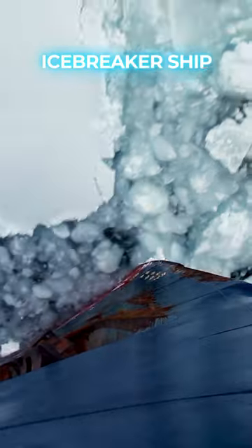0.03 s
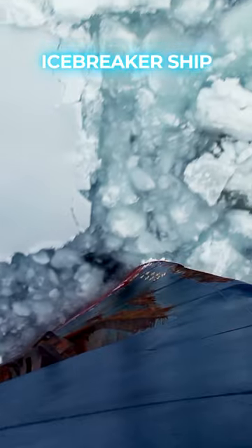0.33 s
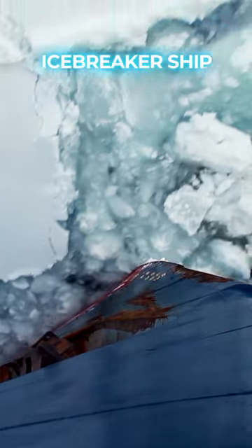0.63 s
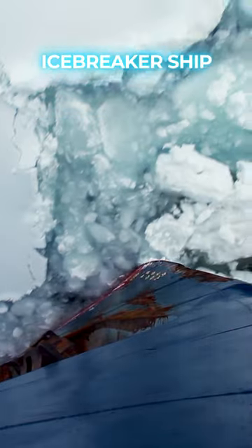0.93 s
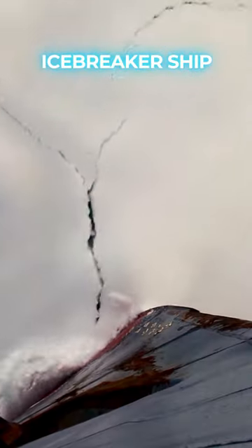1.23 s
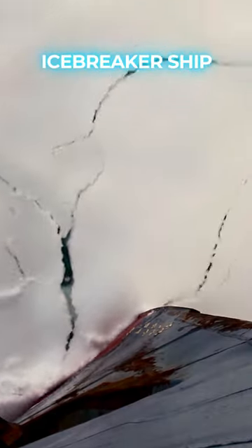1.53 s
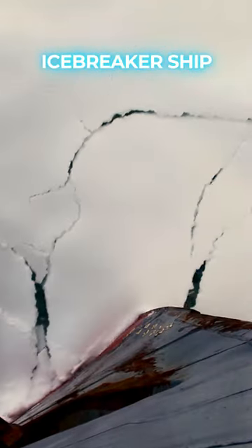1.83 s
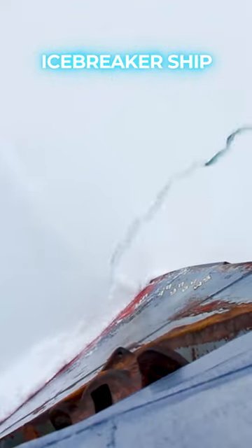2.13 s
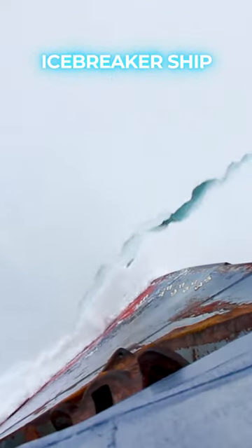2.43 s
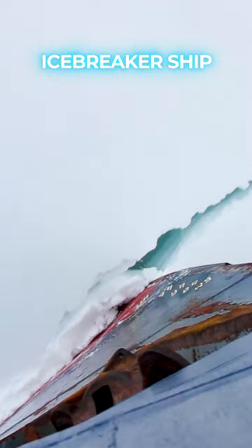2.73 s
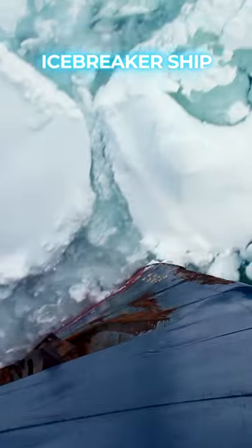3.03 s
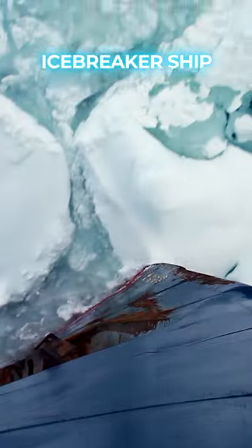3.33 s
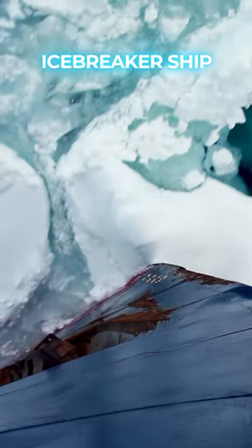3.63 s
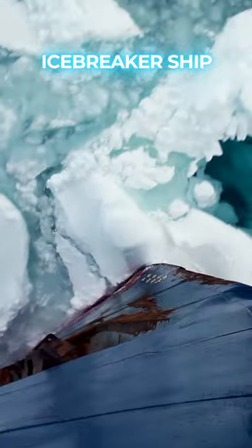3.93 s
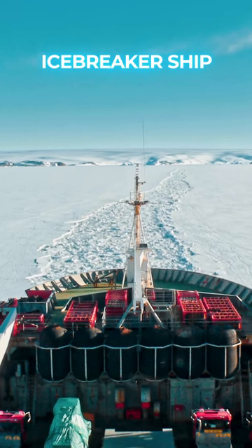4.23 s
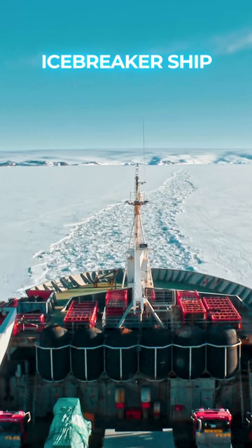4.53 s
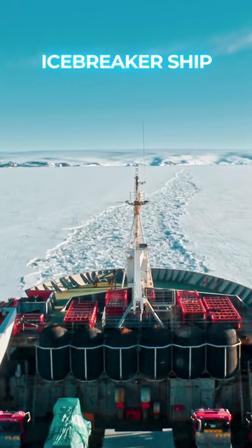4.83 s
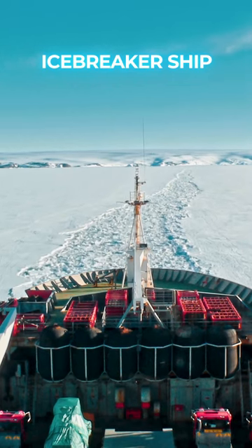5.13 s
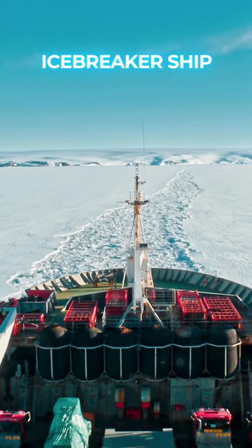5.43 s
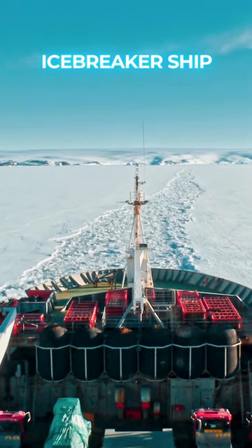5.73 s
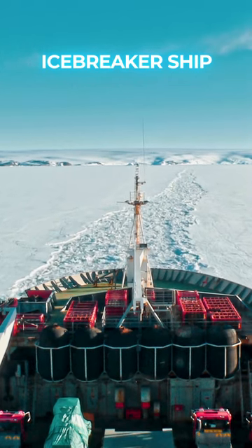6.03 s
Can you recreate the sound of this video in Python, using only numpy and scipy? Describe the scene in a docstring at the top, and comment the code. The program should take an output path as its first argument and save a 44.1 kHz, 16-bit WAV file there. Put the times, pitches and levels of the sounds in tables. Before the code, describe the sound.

Close to a ship's bow in sea ice, a deep, muffled boom opens, with fizzing slush that dies away after half a second. Until about 4 seconds, ice grinds along the steel and crunches in surges, with sharp cracks, hissing powder and dull knocks of loose blocks. Faint, rough creaks recur until 2.7 seconds. Breaking slabs boom and rattle against the hull at about 1.6 and 2.1 seconds, then rumble as they roll underneath. The crunching is strongest around 3.4 and 3.8 seconds, where another deep boom lands. Three thin, bright clicks stand apart from the ice at about 0.5, 3.1 and 4.1 seconds. An engine rumble swells from 3.6 seconds, and just after 4 seconds the crunching stops and the microphone is on the open deck. Wind, steady engine rumble and a thin, wavering machinery whine continue until the end, at about 6 seconds.

```python
"""A deep boom and a wash of slush, heard close up as an icebreaker's bow rides onto sea ice.
Floes grind and creak along the steel, the ice snaps, crunches in surges and sheds hissing powder,
and loose blocks knock on the bow. Breaking slabs ring the hull, then rumble as they roll under it.
Three thin, bright clicks stand apart from the ice. After four seconds the microphone is on the
open deck: wind, a steady engine rumble and a thin machinery whine."""
import sys
import numpy as np
from scipy import signal
from scipy.fft import rfft, irfft
from scipy.io import wavfile

SR = 44100
rng = np.random.default_rng(int(sys.argv[2]) if len(sys.argv) > 2 else 0)


def wrap_up_sound(samples):
    """Save the sound to the file named by the first command line argument, as 16-bit audio."""
    columns = np.atleast_2d(samples).T
    # keep every value between -1 and 1, then stretch to whole-number steps
    tamed = np.clip(columns, -1, 1)
    steps = np.round(tamed * 32767).astype(np.int16)
    wavfile.write(sys.argv[1], SR, steps)


N = 268569
T = np.arange(N) / SR
FREQ = np.maximum(np.fft.rfftfreq(N, 1 / SR), 1)
TOP_HZ = 15850

# Tone colours at the microphone. Each row: frequency in Hz, relative spectral density in dB.
DECK_COLOUR = [(11, -25), (18, 4), (36, -6), (83, -7), (99, -13.5), (128, -10.5), (152, -16), (180, -13.5),
               (226, -15.5), (317, -14), (355, -14), (1020, -26.5), (1310, -30), (2130, -37), (3300, -45.5),
               (4900, -52), (8500, -61.5), (16000, -72)]
SLUSH_COLOUR = [(1500, 2), (2300, 1), (2800, -2), (4000, -4), (5200, -5), (6300, -12), (9000, -41)]
POWDER_COLOUR = [(2000, 1), (3500, -2), (5500, -0.5), (7500, -1), (10500, -3.5), (11800, -7), (13000, -15),
                 (16000, -16)]
CRUNCH_COLOUR = [(300, -15), (600, -1), (900, -4), (1250, -3.5), (1750, -2.5), (2300, -10), (3100, -17),
                 (4700, -18), (6500, -40), (10000, -38), (16000, -66)]
GRIND_COLOUR = [(18, -17), (28, 7), (45, -2.5), (85, 4), (120, 0), (180, -2), (280, -7), (370, -7.5),
                (520, -13), (750, -18.5), (1100, -23.5), (2200, -36), (4000, -59)]
RATTLE_COLOUR = [(110, -12), (175, 2), (225, -2), (290, -1), (350, 3), (420, -4.5), (490, -3), (560, -10),
                 (660, -16), (1000, -19.5), (1400, -27), (2000, -31), (3000, -39), (4700, -49), (7000, -70)]
# Stereo image on deck and at the bow. Each row: frequency in Hz, correlation of left and right.
DECK_IMAGE = [(60, 0.28), (290, 0.25), (1400, 0.28), (15000, 0.3)]
BOW_IMAGE = [(40, 0.49), (120, 0.72), (300, 0.5), (700, 0.2), (1500, 0.25), (3100, 0.25), (6800, 0.7),
             (14000, 0.71)]
# Engine hum and machinery whine. Each row: frequency in Hz, rms level in dB.
MACHINE_TONES = [(79.5, -39), (314, -42.5), (535, -53), (627, -55), (705, -55), (773, -54), (787, -51.5),
                 (851, -50), (941, -54), (1005, -46.8), (1082, -53), (1154, -55.5), (1181, -61),
                 (1384, -61), (1550, -59), (1685, -63), (1929, -62), (2072, -64), (2170, -60.5),
                 (2848, -72), (3112, -71)]
# Ice creaking under load. Each row: centre in seconds, rms level in dB, pitch in Hz,
# half length in seconds.
ICE_CREAKS = [(.11, -50, 1785, .09), (.36, -50, 1790, .1), (.55, -46, 1780, .07), (.975, -45, 1800, .03),
              (1.2, -45, 1760, .035), (1.85, -45, 1690, .027), (2.384, -45.5, 1690, .027),
              (2.69, -45, 1210, .025)]
# Loose blocks on the bow. Each row: start in seconds, level in dB, pitch in Hz, decay in seconds.
BLOCK_KNOCKS = [(.046, -22, 345, .02), (.112, -12.5, 150, .042), (.428, -19, 340, .02),
                (.475, -21, 170, .02), (.55, -21, 345, .02), (.618, -16, 135, .025),
                (1.068, -23, 350, .014), (1.146, -18.5, 200, .016), (1.243, -24.5, 880, .014),
                (1.272, -18, 185, .018), (1.704, -18, 600, .007), (2.237, -20, 550, .009),
                (2.955, -22, 230, .025), (3.043, -16.5, 350, .009), (3.048, -15, 150, .011),
                (3.787, -16.5, 345, .022)]
# The ring of a loose block. Each row: multiple of its pitch, relative level in dB.
BLOCK_MODES = [(.3, -4), (1, 0), (1.37, -8), (2.2, -16)]
# Short, sharp sounds. Each row: start in seconds, level in dB, centre in Hz, decay in seconds,
# share of clean impulse from 0 to 1.
TRANSIENTS = [(.058, -32, 9000, .001, .85), (.157, -30, 3300, .005, .35), (.229, -26, 2200, .008, .25),
              (.313, -36, 9500, .006, .25), (.5277, -24, 10000, .001, .9), (.629, -23.5, 2700, .006, .25),
              (.677, -27.5, 3000, .003, .5), (.951, -26.5, 2100, .007, .35), (1.052, -45, 12000, .004, .2),
              (1.823, -35, 6000, .002, .5), (1.861, -25.5, 6500, .006, .5), (2.074, -36, 10100, .001, .8),
              (2.357, -33, 7000, .002, .5), (2.395, -27.5, 5500, .008, .5), (2.759, -32, 8500, .007, .4),
              (2.845, -42, 7000, .007, .3), (2.915, -40, 7500, .007, .3), (3.0575, -28, 10000, .003, .55),
              (3.619, -41.5, 8900, .0035, .35), (3.741, -41, 8500, .003, .45),
              (4.057, -36, 8500, .001, .75)]
# Three thin, bright clicks; the other rows are ice cracks.
CLICKS = [row for row in TRANSIENTS if row[0] in (.5277, 3.0575, 4.057)]
ICE_CRACKS = [row for row in TRANSIENTS if row not in CLICKS]
# Snow sliding off the floes. Each row: peak time in seconds, level in dB, rise and fall in seconds.
SNOW_SPILLS = [(1.031, -57.5, 0.17, 0.11), (1.33, -53.5, 0.086, 0.09), (1.62, -63.5, 1.4, 0.55),
               (2.05, -57.5, 0.17, 0.06), (2.628, -57.5, 0.35, 0.15), (2.845, -53.5, 0.054, 0.033),
               (3.1, -54, 0.03, 0.15), (3.53, -53, 0.078, 0.052)]
# Ice crushed at the bow. Each row: peak time in seconds, crunch, powder and grinding levels in dB,
# rise and fall of the crunch in seconds.
CRUSH_SURGES = [(.36, -45, -59, -29.5, 0.79, 0.58), (.645, -41, -69, -32.5, 0.074, 0.075),
                (.96, -40, -64, -53, 0.062, 0.068), (1.033, -42.5, -62, -34, 0.024, 0.033),
                (1.155, -42.5, -60, -31.5, 0.067, .045), (1.24, -39, -53.5, -33.5, 0.081, 0.051),
                (1.31, -44, -59, -34.5, 0.035, 0.051), (1.865, -42.5, -57, -35, 0.059, 0.06),
                (2.397, -41.5, -57, -46, 0.057, 0.049), (2.72, -43.5, -56, -35, 0.066, 0.077),
                (2.97, -51, -79, -33.5, 0.043, 0.07), (3.058, -48, -53.5, -41, 0.0041, 0.055),
                (3.385, -38, -51, -29.5, 0.11, 0.082), (3.47, -39, -52, -29, 0.061, 0.067),
                (3.815, -37.5, -53, -35, 0.072, 0.052), (3.865, -36, -53, -32.5, 0.046, 0.053)]
# Slabs rolling under the hull. Each row: peak time in seconds, rumble and scraping levels in dB,
# rise and fall in seconds.
SLAB_ROLLS = [(1.86, -26.5, -34.5, 0.15, 0.21), (2.39, -24, -33, 0.5, 0.27), (3.6, -25, -39, 0.58, 0.7),
              (4.6, -33, -50, 0.21, 0.21)]
# Slabs breaking. Each row: start in seconds, force in dB, length in seconds, rattle level in dB,
# hardness as the frequency in Hz above which the blow weakens.
SLAB_BREAKS = [(.064, 4, .055, -29, 105), (1.128, -12, .04, -37, 300), (1.561, 2.5, .135, -24, 300),
               (1.9, -17, .05, -30.5, 300), (2.095, 2, .125, -25, 300), (2.434, -15, .05, -30.5, 300),
               (3.761, -11, .022, -27, 300), (3.801, 8, .022, -35, 75)]
# The ring of the hull. Each row: frequency in Hz, relative level in dB,
# decay as a share of the break's length.
HULL_MODES = [(60, -7.5, .8), (79, -7.5, .9), (108, -3, .7), (148, -8, 1.0), (172, -11, 1.0),
              (248, -17, .4), (325, -17, .8)]


def undb(db):
    """Decibels to gain."""
    return 10 ** (np.asarray(db) / 20)


def across(points):
    """(Hz, value) points joined on a log-frequency axis."""
    hz, value = np.transpose(points)
    return np.interp(np.log(FREQ), np.log(hz), value)


def resonance(hz, width):
    """Response of one damped resonance, gain 1 at its centre."""
    return 1 / (1 + 1j * (FREQ ** 2 - hz ** 2) / (FREQ * width))


def lowpass(x, hz, slope=4):
    """Roll off the treble above hz."""
    return irfft(rfft(x) / (1 + (FREQ / hz) ** slope), N)


def resonate(x, hz, width):
    """Pass a signal twice through one resonance."""
    return irfft(rfft(x) * resonance(hz, width) ** 2, N)


def unit(x):
    """Scale to rms 1."""
    return x / np.sqrt(np.mean(x ** 2))


def walk(hz):
    """Smooth random wandering, spread 1."""
    return unit(lowpass(rng.standard_normal(N), hz))


def pan(db):
    """Left and right gains for a level difference; positive is left."""
    return undb(np.array([[db], [-db]]) / 2)


def swell(peak, rise, fall):
    """A load that builds to a rounded crest of 1 and lets go."""
    away = np.maximum((peak - T) / rise, (T - peak) / fall)
    return np.exp(-np.minimum(away, 20) ** 1.84)


def grains(per_s, spread_db):
    """Two unrelated streams of tiny fractures: many faint, a few strong."""
    happens = rng.random((2, N)) < per_s / SR
    size = undb(spread_db * np.minimum(rng.exponential(size=(2, N)), 5))
    return happens * size * rng.choice([-1, 1], (2, N))


def voice(pair, colour, image=BOW_IMAGE, band_hz=(20, TOP_HZ)):
    """Colour two streams as mid and side and decode to stereo; the mid has rms 1 inside the band."""
    mid, side = rfft(pair) * undb(across(colour)) * FREQ ** 2 / (FREQ ** 2 + 10 ** 2)
    alike = np.clip(across(image), 0, 1)
    side = side * np.sqrt((1 - alike) / (1 + alike))
    inside = irfft(mid * (FREQ > band_hz[0]) * (FREQ < band_hz[1]), N)
    return irfft(np.array([mid + side, mid - side]), N) / inside.std()


def transient(start, db, hz, decay, clean):
    """An impulse and a short tail of noise through one broad resonance."""
    impulse = np.arange(N) == int(start * SR)
    tail = rng.standard_normal(N) * (T >= start) * np.exp(-np.abs(T - start) / decay)
    width = hz * np.interp(hz, (600, 6000), (.5, 1.3))  # dull ones ring more narrowly
    parts = lowpass(resonate(np.array([impulse, tail]), hz, width), hz=14500, slope=8)
    weights = np.array([clean, 1 - clean]) / np.abs(parts).max(axis=1)
    return undb(db) * (weights @ parts) * pan(db=.91 * rng.standard_normal())


def machinery():
    """Wavering engine and machinery tones, reflected off the superstructure to the microphone."""
    sound = np.zeros((2, N))
    for hz, db in MACHINE_TONES:
        phase = 2 * np.pi * np.cumsum(hz * (1 + .0016 * walk(7.56))) / SR
        paths = .55 * np.array([walk(1.5), walk(3)])  # each side gets its own phase
        sound += np.sqrt(2) * undb(db + 1.4 * walk(6)) * np.sin(phase + paths)
    return sound


def deck():
    """Out on deck: engine rumble swells first, then at 4.05 s the scene changes and the wind and machinery come
    in at once."""
    arrival = np.clip((T - 3.6) / .32, 0, 1)
    upper_in = np.clip((T - 4.045) / .015, 0, 1)
    deck_db, muted_db = -27, -5
    air = voice(rng.standard_normal((2, N)), DECK_COLOUR, DECK_IMAGE)
    low = lowpass(air, hz=110)
    gusts = undb(1.6 * np.array([walk(12), walk(12)]))  # buffet each side separately
    rumble = low * gusts * pan(db=-2)
    flutter = undb(.4 * walk(7))
    rush = (air - low) * flutter * undb(muted_db * (1 - upper_in))
    return ((rumble + rush) * undb(deck_db) + machinery() * upper_in) * arrival


def clicks():
    """Three thin, bright clicks."""
    return sum(transient(*row) for row in CLICKS)


def slush():
    """Wet brash ice fizzes and crackles past the bow, then dies away."""
    fizz = voice(grains(per_s=6500, spread_db=0), SLUSH_COLOUR)
    crackle = voice(grains(per_s=260, spread_db=2.3), SLUSH_COLOUR)
    wash = unit(fizz + .8 * crackle) * undb(.9 * walk(25))
    level_db, hold_s, fall_db_per_s = -41, .53, 148
    return wash * undb(level_db - fall_db_per_s * np.maximum(T - hold_s, 0)) * pan(db=-1)


def creaks():
    """Loaded ice sticks and slips on the steel: a rough, wavering squeak just right of centre."""
    sound = np.zeros(N)
    sag_hz_per_s = 150  # the pitch sinks as the ice yields
    waver = 1 + .008 * walk(40) + .012 * walk(400)
    rasp = unit(undb(3.5 * walk(120)))
    for centre, db, hz, half_length in ICE_CREAKS:
        phase = 2 * np.pi * np.cumsum((hz - sag_hz_per_s * (T - centre)) * waver) / SR
        envelope = np.exp(-((T - centre) / half_length) ** 2)
        sound += np.sqrt(2) * undb(db) * rasp * np.sin(phase) * envelope
    return sound * pan(db=-1)


def knocks():
    """Loose blocks bump the bow and ring briefly, each at its own pitch."""
    sound = np.zeros(N)
    for start, db, hz, decay in BLOCK_KNOCKS:
        age = np.maximum(T - start, 0)
        blow = undb(db) * (1 - np.exp(-age / .001)) * np.exp(-age / decay)
        for ratio, mode_db in BLOCK_MODES:
            sound += blow * undb(mode_db) * np.sin(2 * np.pi * ratio * hz * age)
    return sound


def cracks():
    """Ice cracks close by: one clean fracture, then a crumble that dies in milliseconds."""
    return sum(transient(*row) for row in ICE_CRACKS)


def powder():
    """Fine powder hisses off the ice, with single crystals crackling out of it."""
    band_hz = (7000, 12000)
    hiss = voice(grains(per_s=16000, spread_db=2), POWDER_COLOUR, band_hz=band_hz)
    crystals = voice(grains(per_s=200, spread_db=2.3), POWDER_COLOUR, band_hz=band_hz)
    return hiss + undb(-9.5) * crystals


def splinters(crushing):
    """Coarse bright chips that fly when the load is high."""
    chips = resonate(grains(per_s=420, spread_db=1.7), hz=4500, width=3000)
    chips = unit(lowpass(chips, hz=6200, slope=8))
    full_load = .75 * crushing.max()
    return chips * undb(-11.5) * crushing * np.minimum(crushing / full_load, 1) ** 2


def chunks():
    """Pieces crumble off the floe edge and ring briefly; small ones are higher and fainter."""
    per_s, low_hz, high_hz, decay_cycles, spread_db = 130, 750, 4200, 13, 2.6
    sound = np.zeros((2, N))
    for when, smallness, luck, place in rng.random((int(per_s * T[-1]), 4)):
        hz = low_hz * (high_hz / low_hz) ** smallness
        start = int(when * N)
        age = T[:min(N - start, SR // 10)]
        size = undb(spread_db * min(-np.log(1 - luck), 3)) * (low_hz / hz) ** .4
        ring = size * np.exp(-age * hz / decay_cycles) * np.sin(2 * np.pi * hz * age)
        sound[:, start:start + len(age)] += ring * np.sqrt([[place], [1 - place]])
    return unit(sound)


def loads():
    """Strength of grinding, crushing and shedding: contact, surges, rolls and spills sum in power."""
    grinding, crushing, shedding = (np.full(N, undb(db) ** 2) for db in (-34, -51.5, -64))
    grind_stretch, powder_lag_s = 1.4, .0024  # grinding moves more slowly; powder trails the crush
    for peak, crunch_db, powder_db, grind_db, rise, fall in CRUSH_SURGES:
        grinding += (undb(grind_db) * swell(peak, grind_stretch * rise, grind_stretch * fall)) ** 2
        crushing += (undb(crunch_db) * swell(peak, rise, fall)) ** 2
        shedding += (undb(powder_db) * swell(peak + powder_lag_s, rise, fall)) ** 2
    for peak, _, scrape_db, rise, fall in SLAB_ROLLS:
        grinding += (undb(scrape_db) * swell(peak, rise, fall)) ** 2
    for peak, db, rise, fall in SNOW_SPILLS:
        shedding += (undb(db) * swell(peak, rise, fall)) ** 2
    return np.sqrt([grinding, crushing, shedding])


def floes():
    """Floes judder along the steel, crush into grains left of centre and shed fine powder."""
    grind = voice(grains(per_s=2500, spread_db=1.5), GRIND_COLOUR, band_hz=(170, 550))
    crunch = voice(grains(per_s=4500, spread_db=.7), CRUNCH_COLOUR, band_hz=(1300, 3000))
    hiss = powder()
    fits = undb(.5 * walk(32))  # the ice gives way in fits: crunch and powder flicker together
    grinding, crushing, shedding = loads()
    sound = grind * grinding
    sound += crunch * crushing * fits * pan(db=4)
    sound += splinters(crushing) * pan(db=1.5)
    sound += chunks() * crushing * undb(-4) * pan(db=3)
    sound += hiss * shedding * fits * pan(db=-1)
    end_s, fade_s = 4.1, .091
    return sound * np.clip((end_s - T) / fade_s, 0, 1)


def dull_blows():
    """A run of dull blows inside the ice, much alike left and right."""
    mid, side = unit(resonate(grains(per_s=1500, spread_db=.5), hz=86.6, width=165))
    return mid + undb(-6.5) * np.array([side, -side])


def rolling_slabs():
    """Broken slabs rumble as they turn over, down under the hull."""
    power = sum((undb(db) * swell(peak, rise, fall)) ** 2 for peak, db, _, rise, fall in SLAB_ROLLS)
    return dull_blows() * np.sqrt(power)


def booms():
    """A slab breaks with one blow and a run of smaller ones; the hull rings and pieces rattle on it."""
    ring, strain, tumble = np.zeros((3, N))
    for start, db, length, rattle_db, hard_hz in SLAB_BREAKS:
        age = np.maximum(T - start, 0)
        force = undb(db) * (1 - np.exp(-age / .004))
        # a soft, broad contact rings only the lowest modes
        reach = lambda hz: 1 / np.hypot(1, (hz / hard_hz) ** 2)
        for hz, mode_db, share in HULL_MODES:
            mode = np.exp(-age / (share * length)) * np.sin(2 * np.pi * hz * age)
            ring += force * reach(hz) * undb(mode_db) * mode
        strain += force * reach(110) * np.exp(-age / length)
        # the pieces gather speed, hit hardest about one length later and settle
        late = age / (.85 * length)
        tumble += undb(rattle_db) * late * np.exp((1 - late ** 2) / 2)
    swing = .52 * ring + .12 * strain * dull_blows()
    # the widest swings flatten, yet the boom stays muffled
    boom = lowpass(.33 * np.tanh(swing / .33), hz=600)
    rattle = voice(grains(per_s=1100, spread_db=2), RATTLE_COLOUR)
    return boom + tumble * rattle


def scene():
    """Close to the bow in the ice, then out on the open deck."""
    bow = floes() + slush() + booms() + rolling_slabs() + cracks()
    return bow + clicks() + knocks() + creaks() + deck()


def record(dry):
    """The sound fades in and out over 4 ms, and the recorder cuts the top."""
    faded = dry * np.minimum(np.minimum(T, T[-1] - T) / .004, 1)
    return signal.sosfilt(signal.ellip(10, .1, 80, TOP_HZ, fs=SR, output="sos"), faded)


dry = scene()
out = record(dry)
wrap_up_sound(out)
```